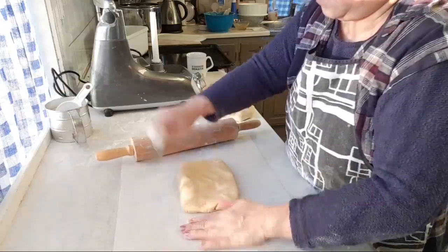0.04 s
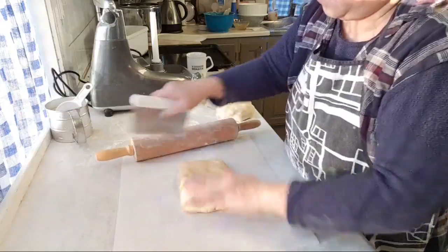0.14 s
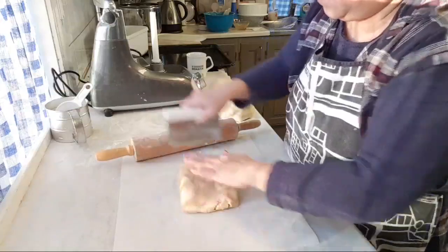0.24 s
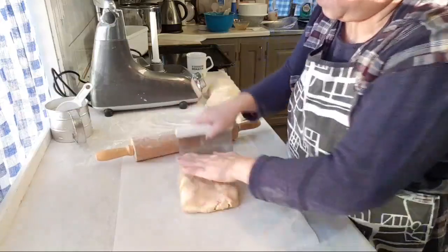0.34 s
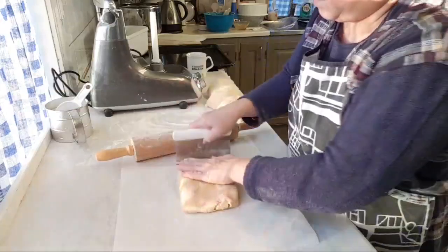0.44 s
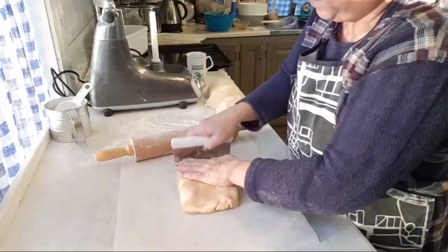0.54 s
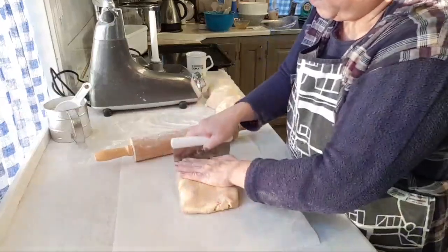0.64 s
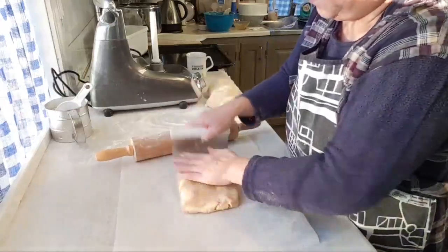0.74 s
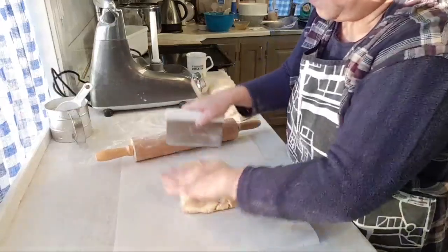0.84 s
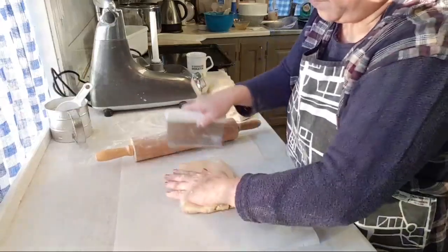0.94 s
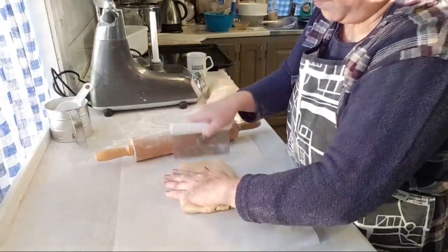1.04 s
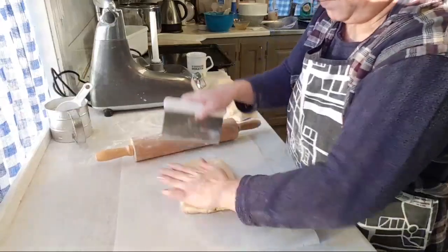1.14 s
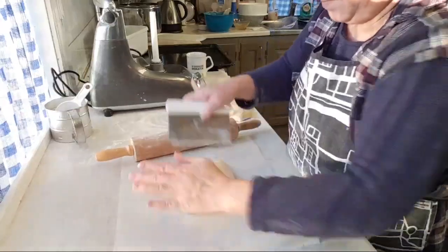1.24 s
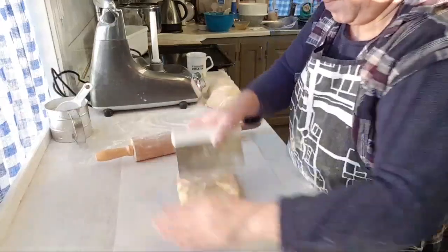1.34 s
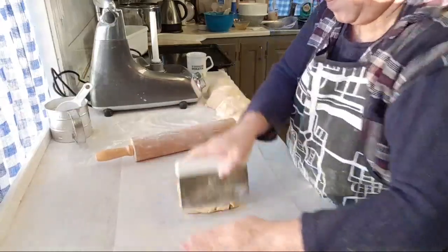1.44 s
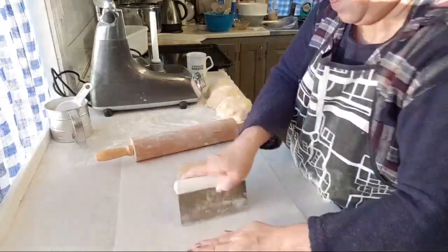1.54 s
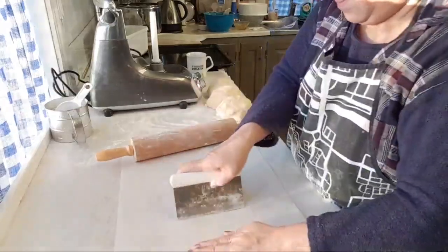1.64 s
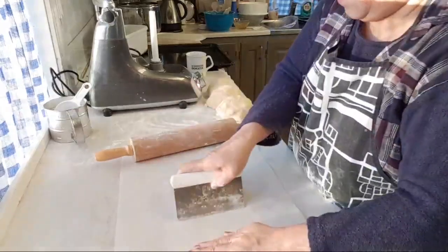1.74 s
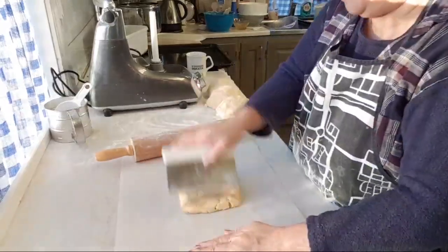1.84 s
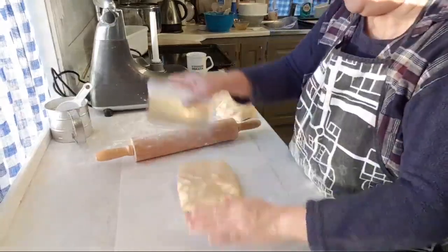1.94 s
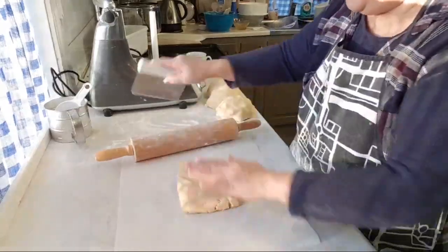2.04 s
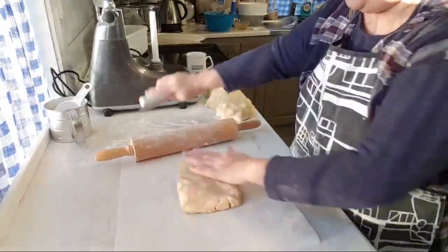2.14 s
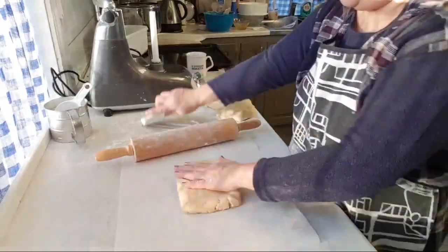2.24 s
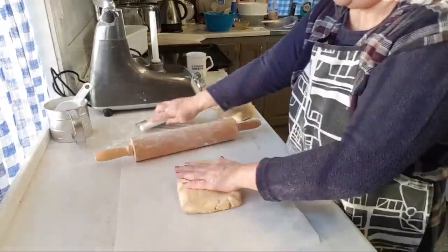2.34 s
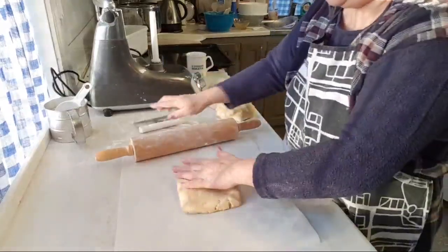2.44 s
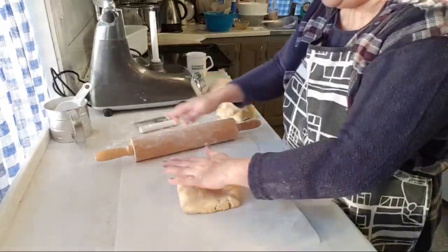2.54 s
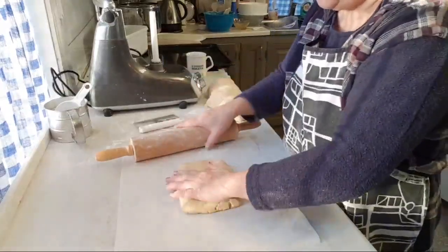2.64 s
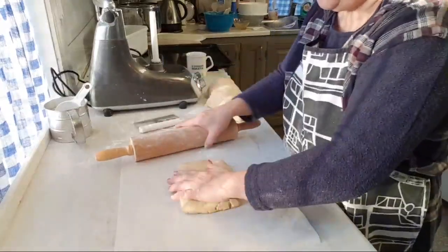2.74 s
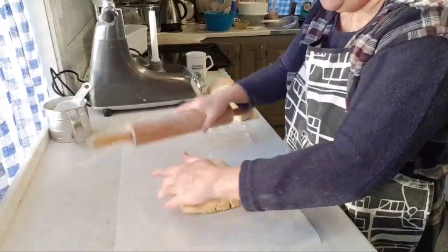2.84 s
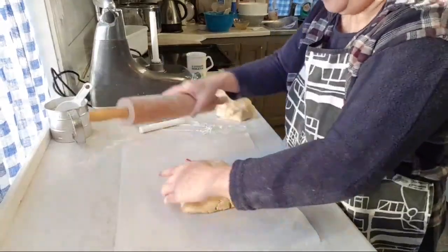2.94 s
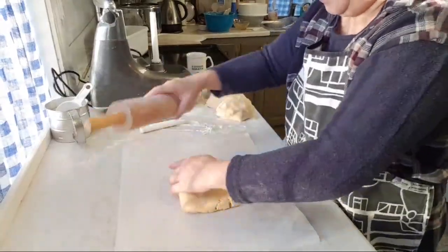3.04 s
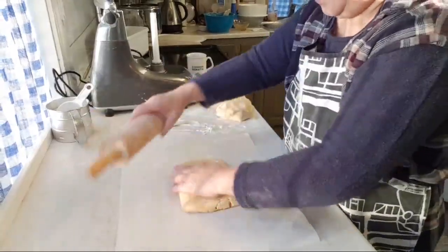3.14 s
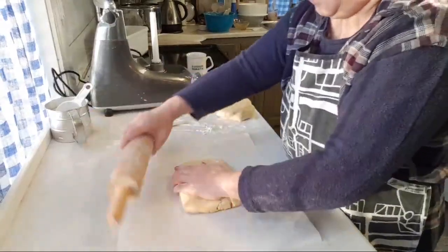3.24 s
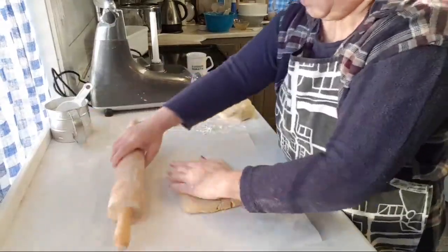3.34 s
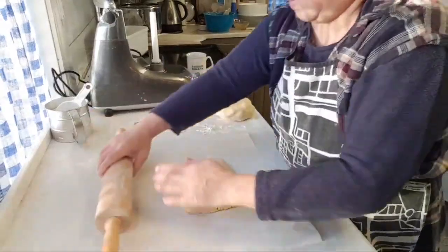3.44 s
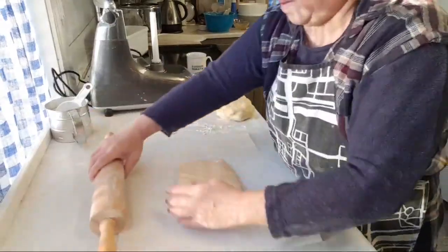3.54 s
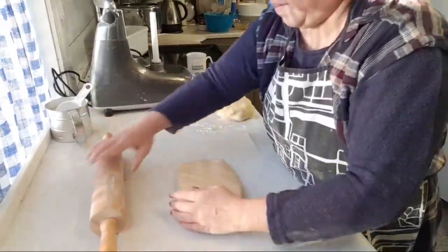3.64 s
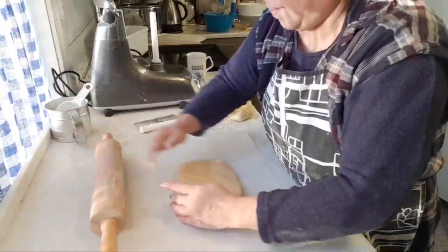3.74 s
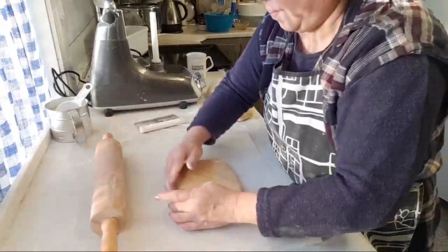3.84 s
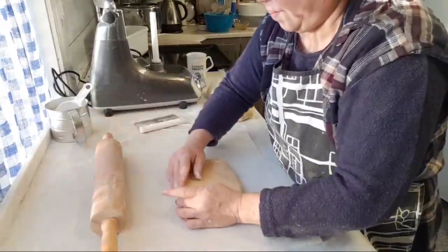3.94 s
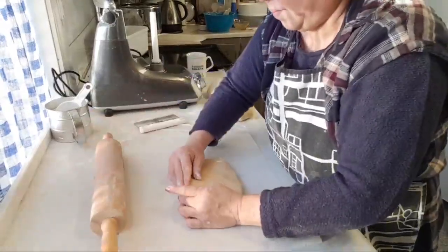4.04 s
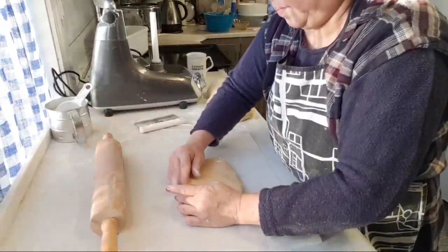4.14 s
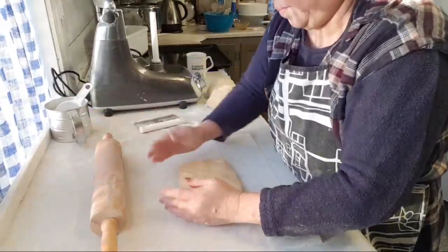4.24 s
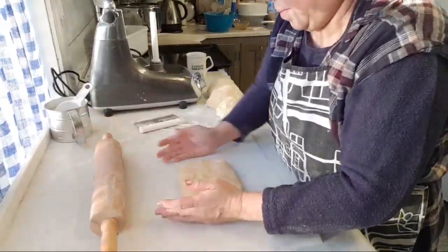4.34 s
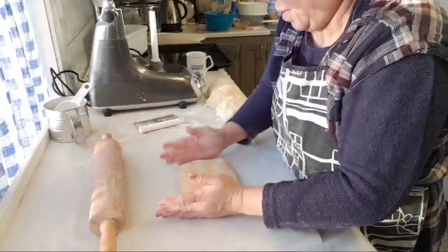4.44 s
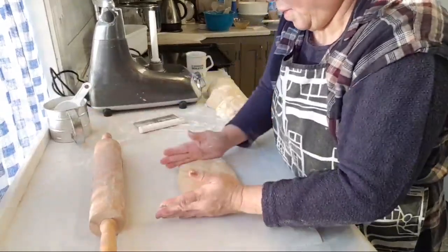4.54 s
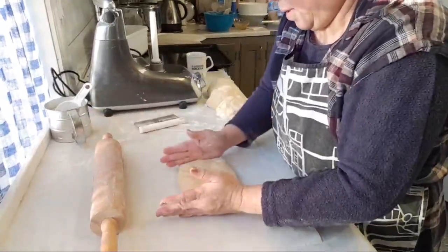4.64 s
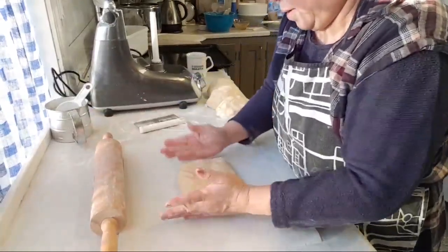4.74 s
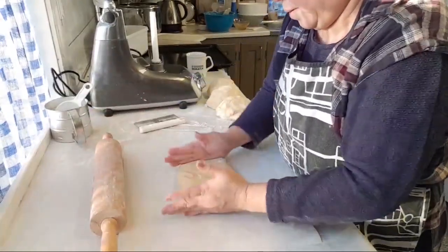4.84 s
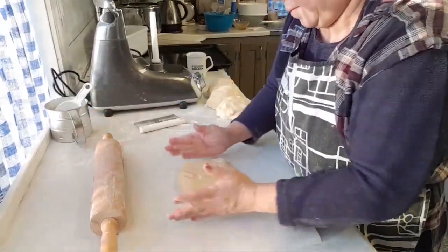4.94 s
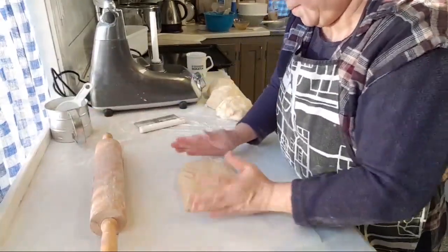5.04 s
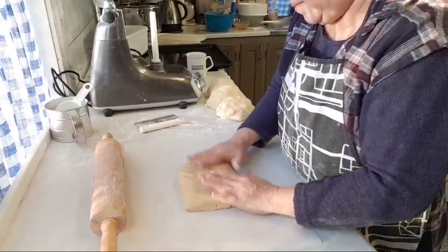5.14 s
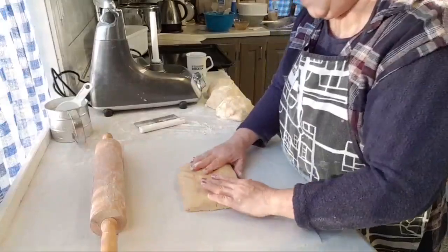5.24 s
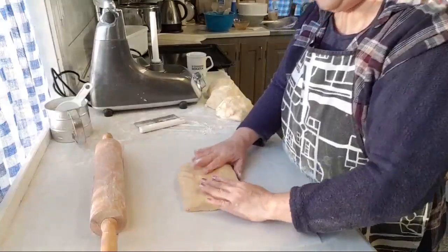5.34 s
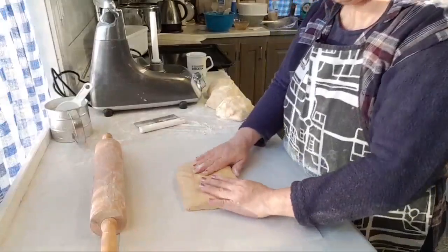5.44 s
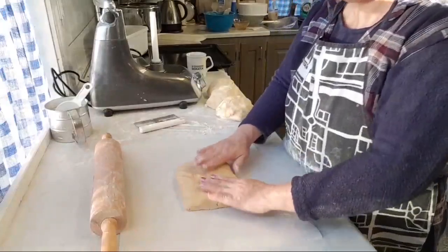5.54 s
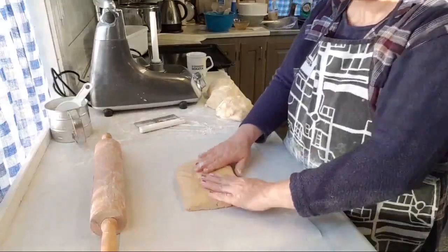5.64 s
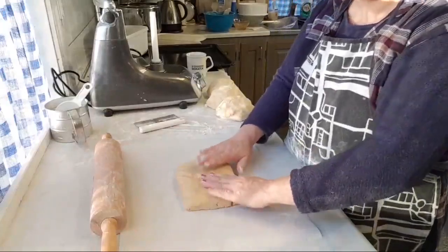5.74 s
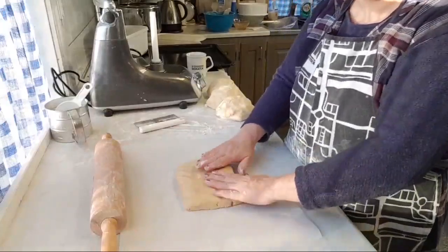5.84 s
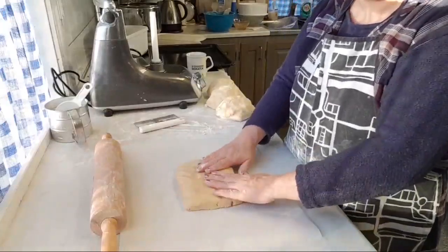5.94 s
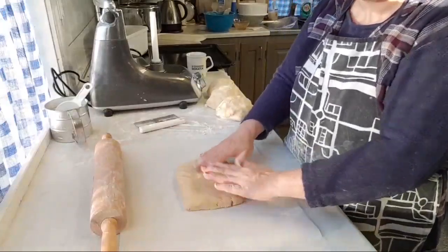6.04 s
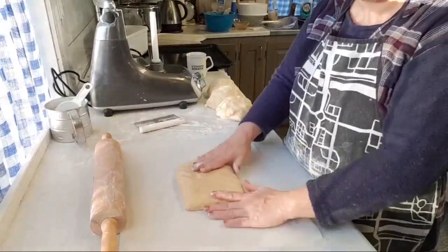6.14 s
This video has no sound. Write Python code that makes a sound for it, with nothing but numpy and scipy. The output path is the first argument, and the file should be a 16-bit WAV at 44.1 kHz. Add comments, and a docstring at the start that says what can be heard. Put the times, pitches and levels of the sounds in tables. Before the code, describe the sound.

A kitchen heard close up, with a faint low hum and short, lively reflections from tiled walls. At the start a knock's metallic ring dies away amid crackling paper. Around 0.4 to 0.55 seconds a steel scraper hits the wooden counter in a hard double blow, with sharp paper snaps and hiss. A lull follows, then another firm knock at about 1.6 with a little crinkling. From 2.3 to 2.5 the scraper is laid down with a light, bright metallic clatter; paper rustles at 2.8. Between 3.35 and 3.65 a rolling pin lands in two dull woody knocks with small bounces and axle rattle. Soft sliding continues; a crisp paper snap stands out at 4.36, with lighter rustles at 4.8 and 5.1. From 5.45 palms pat dough in soft, low thuds with crinkles, ending in a brushing hiss near 6.2.

```python
"""A kitchen, heard from close by, over a faint hum of coloured noise.
First a knock's ring dies away, then a steel dough scraper strikes a wooden counter: damped modes are excited.
Throughout, baking paper and dough slide as swelling noise, and creases snap as band-passed noise bursts.
Then a rolling pin is set down, its wood and loose axle ringing; last, hands pat dough, driving the low modes.
Tiled walls answer every blow and snap with decaying noise."""
import sys
import numpy as np
from scipy import signal
from scipy.fft import rfft, irfft, next_fast_len
from scipy.io import wavfile
from scipy.ndimage import uniform_filter1d

SR = 44100
rng = np.random.default_rng(int(sys.argv[2]) if len(sys.argv) > 2 else 0)


def dump_mix(stems):
    """Bounce the given channels to the path in sys.argv[1] as a 16-bit WAV at rate SR."""
    frames = np.atleast_2d(stems).T  # one column per channel
    limited = np.clip(frames, -1, 1)  # hard clip at full scale
    pcm = np.round(limited * 32767).astype(np.int16)
    wavfile.write(sys.argv[1], SR, pcm)


N = 272979

# upper modes of the wooden counter top: f/Hz, level/dB, t60/s
BOARD_MODES = [(371.6, 4, 0.077), (475, -12, 0.25), (605, -12.5, 0.25), (697, 1, 0.044), (799, -7, 0.073),
               (921.6, -5, 0.13), (1087, -3, 0.084), (1247, -6, 0.11), (1363, 2, 0.052), (1559, -5.5, 0.19),
               (1860, -1.5, 0.075), (1830, 0, 0.036)]


def amp(db):
    """Level to gain: 20 dB is a factor of ten in amplitude."""
    return 10 ** (np.asarray(db) / 20)


def unit(x):
    """Normalisation by the root mean square, to rms 1."""
    return x / np.sqrt(np.mean(x ** 2) + 1e-20)


def along(points, hz):
    """Linear interpolation of (f/Hz, value) points on a logarithmic frequency axis."""
    f, value = np.transpose(points)
    return np.interp(np.log(hz + 1), np.log(f + 1), value)


def filtered(x, response):
    """Linear filtering: the spectrum is multiplied by a response of frequency."""
    size = next_fast_len(x.shape[-1] + 8192)  # padding keeps the tail from wrapping round
    spectrum = rfft(x, size) * response(np.fft.rfftfreq(size, 1 / SR))
    return irfft(spectrum, size)[..., :x.shape[-1]]


def high_pass(hz, corner_hz, order):
    """Response of cascaded first-order high-pass sections."""
    return (1j * hz / corner_hz / (1 + 1j * hz / corner_hz)) ** order


def noise(spectrum, grain_db):
    """Amplitude-modulated coloured noise of rms 1; grain_db makes it crackle at the millisecond scale."""
    grain = unit(uniform_filter1d(rng.standard_normal(N), size=60))
    grainy = rng.standard_normal(N) * amp(grain_db * grain)
    return unit(filtered(grainy, lambda hz: amp(along(spectrum, hz))))


def ring(modes, rough, rise_s, spot_hz=None):
    """Modal superposition: damped sines of scattered strength, strongest near spot_hz, with drifting phases."""
    scatter_db = 1.5
    t = np.arange(SR // 2) / SR
    hz, db, t60 = np.transpose(modes)[:, :, None]
    strength = db + scatter_db * rng.standard_normal(db.shape)
    if spot_hz:
        strength = strength - 18 * np.abs(np.log2(hz / spot_hz))  # dB per octave from the spot's pitch
    # loose contact: a random walk of phase, in steps of rough radians rms per sample
    drift = rough * np.cumsum(rng.standard_normal((len(modes), len(t))), axis=1)
    partials = amp(strength - 60 * t / t60) * np.sin(2 * np.pi * hz * t + drift)
    return partials.sum(0) * (1 - np.exp(-t / rise_s))


def crack(t60):
    """Radiation of a small source: an exponentially dying noise burst with little bass."""
    decay = amp(-60 * np.arange(SR // 2) / SR / t60)
    burst = decay * rng.standard_normal(SR // 2)
    return filtered(burst, lambda hz: high_pass(hz, 250, 2))


def softened(x, contact_ms):
    """Contact duration limits bandwidth: a longer contact feeds less treble, through four causal poles."""
    return filtered(x, lambda hz: 1 / (1 + 1j * hz * contact_ms / 2000) ** 4)


def add(track, s, sound, wet_db):
    """Reverberation: the sound is laid in, then its convolution with fresh, frequency-dependent decaying noise."""
    # reverberation of the tiled walls: f/Hz, t60/s
    wall_decay = [(150, 0.24), (1000, 0.35), (3000, 0.39), (6000, 0.27), (12000, 0.12)]
    hz, t, z = signal.stft(rng.standard_normal(SR // 2), SR, nperseg=256)
    decay = amp(-60 * t / along(wall_decay, hz)[:, None])
    tail = signal.istft(z * decay, SR, nperseg=256)[1]
    tail = tail / np.linalg.norm(tail)
    tail = filtered(tail, lambda hz: high_pass(hz, 180, 2))  # the walls return little bass
    start = round(s * SR)
    track[start:start + SR // 2] += sound
    wall = start + 180  # samples of delay: the nearest wall is a step away
    track[wall:wall + SR // 2] += amp(wet_db) * signal.fftconvolve(sound, tail)[:SR // 2]


def without_deep_bass(x):
    """High-pass filtering: the blows of scraper and pin carry little of the deepest bass."""
    return filtered(x, lambda hz: high_pass(hz, 73, 3))


def hum():
    """Stationary coloured noise: appliances and the microphone's own noise, at a slowly varying level."""
    # noise spectrum: f/Hz, relative spectral level/dB
    hum_spectrum = [(15, -41.5), (30, 0.5), (60, 6.5), (123, 7), (206, -3), (256, -8), (384, -6.5),
                    (575, -17), (775, -12.5), (1840, -25.5), (2690, -33), (3430, -34.5), (5570, -25),
                    (8830, -33.5), (11300, -26.5), (16000, -29.5)]
    # course of the hum: t/s, rms level/dB
    hum_course = [(0, -53.5), (1.2, -57.5), (2.3, -57.5), (3.1, -61.5), (4, -57.5), (5.2, -58),
                  (6.19, -56.5)]
    t, level_db = np.transpose(hum_course)
    level = amp(np.interp(np.arange(N) / SR, t, level_db))
    return level * noise(hum_spectrum, grain_db=-0.7)


def thump():
    """Build-up of resonance: the counter's low modes swell gradually before they decay."""
    # lowest modes of the counter top: f/Hz, level/dB, t60/s
    low_modes = [(68, -12, .2), (134, -1.5, .22), (205, -12.5, .08), (234.7, -1.5, .085)]
    return ring(low_modes, rough=0.0013, rise_s=0.0025)


def scraper():
    """Impact excitation: the steel edge cracks on the counter, and board and blade ring in their modes."""
    # scraper contacts, and at the start the dying ring of an earlier knock in three pitches:
    # t/s, blow level/dB, contact time/ms, counter thump level/dB, board level/dB,
    # board pitch at the struck spot f/Hz, blade level/dB, blade pitch at the struck spot f/Hz
    contacts = [(.001, -43.5, .27, -17, 9, 980, 10, 980), (.003, -50, .3, -23, 0, 980, 9.5, 1550),
                (.056, -67, 0.27, -17, 1, 980, 32, 3700), (.404, -20, .37, -1, 7, 1000, -6.5, 1610),
                (.408, -10.5, .58, -7.5, -8.5, 350, -16, 1012),
                (0.43, -35.5, .26, -16, 9, 1000, -9.5, 1000), (.519, -25.5, 0.73, -18, 3, 357, -11, 990),
                (.526, -27, 0.63, 0, 5, 890, -37, 1000), (.641, -59.5, .32, -20, -4, 1250, 17.5, 1320),
                (1.574, -17, .28, -8, -1, 1150, -5, 1310), (1.584, -27, 0.91, -6, 12, 600, -30, 1000),
                (1.614, -48, .33, 8, 19, 1350, 17, 2250), (1.625, -45, 0.26, 10, -8, 1300, 9.5, 1340),
                (2.276, -40.5, 0.47, 4, -9, 350, -14, 1000), (2.3, -39, .1, 3, 5.5, 368.6, -4, 4130),
                (2.303, -41.5, .45, -14, 8, 720, 1.5, 2560), (2.328, -34.5, .37, -4, 3, 712, 1, 1580),
                (2.432, -12.5, .3, -16, 3.5, 604, 5.5, 4000), (2.44, -14.5, .29, -20, -1.5, 1850, 1, 2474),
                (2.45, -23.5, .34, 1.5, 6, 379.6, 13.5, 5860), (2.462, -25.5, 0.33, -15, 8, 900, 4.5, 2540),
                (2.485, -32.5, .15, -3.5, 9.5, 1800, -8.5, 2396),
                (2.628, -45.5, 1.3, 9, -11, 350, -27, 997)]
    # modes of the steel blade: f/Hz, level/dB, t60/s
    blade_modes = [(990, -9.5, 0.5), (1344, -5.5, 0.12), (1566, -10, 0.47), (1670, -8.5, 0.3),
                   (2282, 0.5, 0.19), (2535, -0.5, 0.065), (2520, -3.5, .15), (2760, -1, 0.09),
                   (2934, -14.5, 0.14), (3730, -5, 0.17), (4110, -2.5, 0.11), (4538, -5, 0.08),
                   (5060, -7, 0.13), (5600, -2, 0.097), (5900, -2.5, 0.055), (6300, -9.5, 0.099),
                   (7160, -10, .05)]
    track = np.zeros(N + SR)
    for s, db, contact_ms, thump_db, board_db, board_hz, blade_db, blade_hz in contacts:
        board = ring(BOARD_MODES, rough=0.09, rise_s=0.00024, spot_hz=board_hz)
        # the louder the blade rings, the more it rattles
        rattle = .115 * amp(.2 * (db + blade_db + 12))
        blade = ring(blade_modes, rough=rattle, rise_s=0.00017, spot_hz=blade_hz)
        # hard, short contacts shake the whole sheet
        clatter = amp(blade_db + 16.5 - 46 * contact_ms) * crack(0.081)
        blow = amp(board_db) * board + amp(blade_db) * blade + clatter
        blow = softened(blow + amp(10) * crack(0.0074), contact_ms)
        blow = softened(blow, 0.22)  # the plastic grip damps the highest treble
        add(track, s, amp(db) * without_deep_bass(blow + amp(thump_db) * thump()), wet_db=-3.5)
    return track[:N]


def strokes():
    """Exponential growth and decay: gains of hiss and rub follow straight dB slopes; strokes add as powers."""
    # sliding of paper and dough: t/s at the peak, hiss level/dB, rise/s per 20 dB, fall/s per 20 dB,
    # rub level over the hiss/dB; rises and falls are at least 3 ms
    slides = [(.03, -49, .1, 0.033, 4.5), (.07, -45.5, 0.021, 0.15, 2.5), (0.155, -44, 0.007, 0.05, 4),
              (0.408, -33.5, 0.009, 0.17, 0), (0.517, -29, 0.078, 0.016, -2.5),
              (0.553, -38, 0.044, .06, -1.5), (0.768, -69.5, 0.22, 0.084, 14.5),
              (1.04, -66.5, 0.195, .4, -2), (1.521, -42, 0.0144, 0.081, 2), (1.59, -36.5, .05, 0.1, -10),
              (1.633, -39.5, 0.074, 0.065, 3), (1.79, -56.5, .06, 0.13, 0.5), (1.98, -58.5, .17, .09, -0.5),
              (2.15, -63.5, .3, .11, -6), (2.31, -54, 0.036, 0.29, 4.5), (2.722, -53, 0.019, .03, -0.5),
              (2.778, -43, 0.04, .09, -2.5), (3.222, -56.5, 0.04, 0.11, -5), (3.38, -53.5, .03, 0.023, 8),
              (3.5, -53.5, .07, .19, -3), (3.72, -58, .1, 0.091, -6.5), (3.96, -46.5, .16, 0.21, -9),
              (4.188, -51, 0.023, 0.36, -9.5), (4.36, -30, .013, .085, -5), (4.499, -51, .1, 0.16, -5.5),
              (4.69, -54.5, 0.019, .05, -27.5), (4.811, -44, 0.011, 0.085, -5),
              (4.93, -49, 0.032, .035, -18), (5.119, -48, 0.054, 0.024, -9.5),
              (5.34, -46.5, 0.24, 0.12, -7), (5.461, -44.5, .07, 0.11, 2), (5.59, -56.5, .2, 0.043, 6.5),
              (5.658, -42.5, 0.015, .05, -3.5), (5.74, -49.5, .1, 0.059, -4),
              (5.825, -53, 0.084, 0.04, -4.5), (5.909, -57, 0.0286, 0.17, -1.5),
              (6.19, -25.5, 0.0076, .05, 1)]
    rub_lingers = 1.313  # the rub's fall time over the hiss's
    t = np.arange(0, N + 44, 44) / SR
    hiss_power, rub_power = 0, 0
    for s, db, rise_s, fall_s, rub_db in slides:
        swell = np.minimum(t - s, 0) / max(rise_s, .003)
        die = np.maximum(t - s, 0) / max(fall_s, .003)
        hiss_power = hiss_power + amp(db + 20 * (swell - die)) ** 2
        rub_power = rub_power + amp(db + rub_db + 20 * (swell - die / rub_lingers)) ** 2
    return [np.interp(np.arange(N) / SR, t, np.sqrt(power)) for power in (hiss_power, rub_power)]


def paper():
    """Friction noise and buckling: sliding gives grainy hiss and dull rub; creases snap with a short fizz."""
    # snaps of the paper: t/s, level/dB
    snaps = [(0.0303, -34), (0.0648, -25), (0.1555, -23), (0.3373, -45), (0.425, -26), (0.5085, -18.5),
             (0.5457, -18.5), (0.5643, -16.5), (0.742, -38), (0.784, -29), (1.1369, -47), (1.511, -26.5),
             (1.5224, -21.5), (1.8658, -44), (1.949, -37.5), (1.9694, -34.5), (2.0875, -44), (2.1431, -41),
             (2.7134, -46.5), (2.763, -23.5), (4.118, -41.5), (4.171, -43), (4.3565, -16.5), (4.801, -35.5),
             (5.1159, -24.5), (5.2079, -37.5), (5.4555, -27.5), (5.47, -28.5), (5.491, -34),
             (5.5338, -32.5), (5.55, -34), (5.656, -31.5), (5.8072, -38), (5.901, -28), (6.1824, -32.5)]
    # hiss of sliding: f/Hz, relative spectral level/dB
    hiss_spectrum = [(1470, -62.5), (2500, -23), (2880, -14), (3330, -12.5), (5780, -5.5), (8940, -9.5),
                     (10400, -2), (12000, -2), (15200, -7), (16000, -9.5)]
    # duller rub of sliding: f/Hz, relative spectral level/dB
    rub_spectrum = [(400, -16.5), (900, -10.5), (2000, -10.5), (4000, -6), (6500, -10), (9000, -24)]
    crease_hz, crease_spread = 4460, 0.092  # median pitch, scatter of its natural logarithm
    snap_t60, fizz_db = .025, -6  # s, dB
    hiss, rub = strokes()
    track = np.zeros(N + SR)
    for s, db in snaps:
        centre = crease_hz * np.exp(crease_spread * rng.standard_normal())

        def crease(hz):
            """Response of two equal damped resonators in cascade."""
            return (1j * hz * 0.74 * centre / (centre ** 2 - hz ** 2 + 1j * hz * 0.7 * centre)) ** 2

        fizz = filtered(crack(snap_t60), lambda hz: high_pass(hz, 7000, 4))
        snap = filtered(crack(snap_t60), crease) + amp(fizz_db) * fizz
        add(track, s, amp(db) * snap, wet_db=-8.5)
    sliding = hiss * noise(hiss_spectrum, grain_db=2.0) + rub * noise(rub_spectrum, grain_db=1.5)
    return track[:N] + sliding


def pin():
    """Impact on coupled bodies: the wooden barrel lands and rings with the board, and its loose axle clacks."""
    # rolling pin contacts: t/s, blow level/dB, contact time/ms, counter thump level/dB,
    # board level/dB, axle rattle level/dB
    landings = [(2.929, -49, 0.24, -16.5, -19, -13), (3.045, -71.5, 0.43, -19, -10, 5.5),
                (3.222, -49.5, 0.15, -9.5, -3.5, -11), (3.274, -64.5, .59, -9.5, -12.5, 2),
                (3.297, -48, .3, -16, -16.5, -12), (3.332, -62, .5, -8.5, -1.5, 4),
                (3.365, -5, 0.8, -8.5, -12, -36.5), (3.378, -7, 0.48, -18, -24.5, -39),
                (3.388, -19, 1.6, -7, -27.5, -3), (3.401, -22.5, 0.69, -8, -9, -12.5),
                (3.42, -26.5, 1.6, -7, -34, -5.5), (3.464, -43, .5, -10, -25, -5),
                (3.487, -5, 0.77, -11.5, -19.5, -33), (3.509, -24, 0.42, -17, -19, -35),
                (3.527, -20.5, 1.8, -4.5, 5.5, -23.5), (3.545, -30, 1.3, 8, -8, -34.5),
                (3.63, -30, 0.85, -15, -16.5, -21)]
    # modes of the wooden barrel: f/Hz, level/dB, t60/s
    barrel_modes = [(542, 0, 0.024), (713, 9.5, 0.023), (960, 6, 0.028), (1274, -12.5, 0.1)]
    # modes of the axle: f/Hz, level/dB, t60/s
    axle_modes = [(2470, 0, .09), (2600, -7, .08), (2760, -16, .05), (3600, -11, .012), (4300, -9, .012),
                  (4840, -7, .018)]
    track = np.zeros(N + SR)
    for s, db, contact_ms, thump_db, board_db, axle_db in landings:
        barrel = ring(barrel_modes, rough=0.099, rise_s=0.0063)
        board = ring(BOARD_MODES, rough=0.13, rise_s=0.0039, spot_hz=347)
        axle = ring(axle_modes, rough=.055, rise_s=0.0001) + amp(-6) * softened(crack(0.0038), .2)
        blow = softened(barrel + amp(board_db) * board + amp(0.5) * crack(0.015), contact_ms)
        blow = blow + amp(axle_db) * axle + amp(thump_db) * thump()
        add(track, s, amp(db) * without_deep_bass(blow), wet_db=-4)
    return track[:N]


def pats():
    """Soft impact: a palm pushes the counter through dough, exciting low modes, with a small slap of skin."""
    # hand pats: t/s, blow level/dB, contact time/ms, thump level/dB, knock level/dB, slap level/dB
    palm_blows = [(4.805, -43.5, 3.8, 3, -7, -11), (5.466, -17.5, 5.3, 3, -10, -15),
                  (5.651, -23, 3.85, 5, -8, -6), (5.805, -14, 7, 1, -8.5, -15.5),
                  (5.898, -20.5, 3.2, -4, -4, -7), (5.956, -34, 3.4, 3.5, -21, -6),
                  (6.154, -18, 4.3, 2, -11.5, -12.5)]
    track = np.zeros(N + SR)
    for s, db, contact_ms, thump_db, knock_db, slap_db in palm_blows:
        knock = amp(knock_db) * ring(BOARD_MODES, rough=0.037, rise_s=0.001, spot_hz=410)
        push = softened(amp(thump_db) * thump() + knock, contact_ms)
        slap = amp(slap_db) * softened(crack(0.03), 0.5)
        add(track, s, amp(db) * (push + slap), wet_db=-1.5)
    return track[:N]


def scene():
    """Superposition: the pressures of all sources add at one microphone."""
    return (hum() + scraper() + paper() + pin() + pats())[None]


def record(dry):
    """Band limitation: the pickup cuts the deepest bass and keeps nothing from its upper limit on."""
    top_hz, bass_hz = 15900, 40
    return filtered(dry, lambda hz: (hz < top_hz) * high_pass(hz, bass_hz, 6))


dry = scene()
out = record(dry)
dump_mix(out)
```